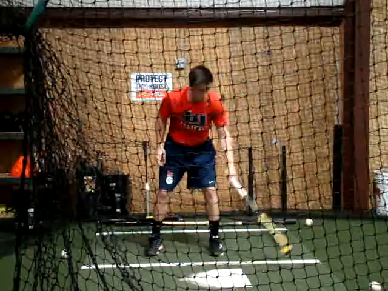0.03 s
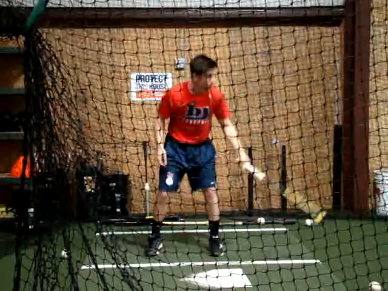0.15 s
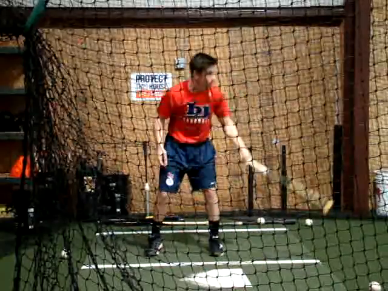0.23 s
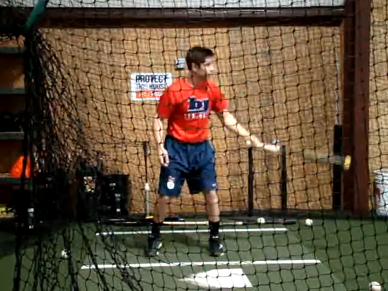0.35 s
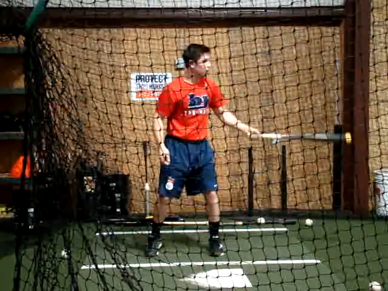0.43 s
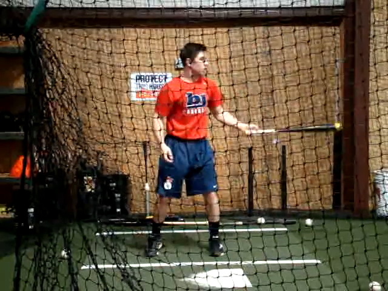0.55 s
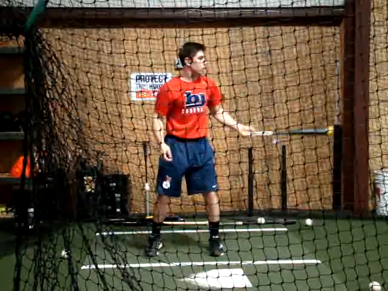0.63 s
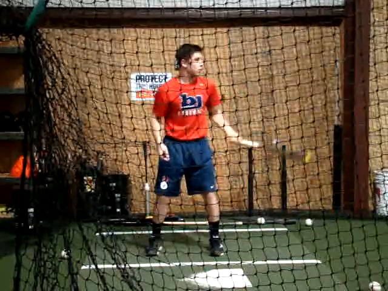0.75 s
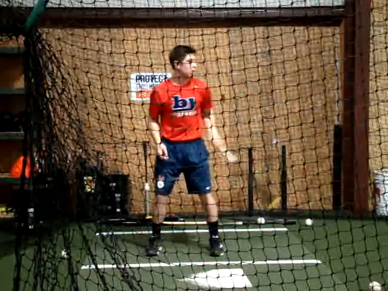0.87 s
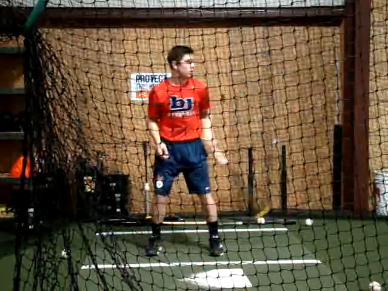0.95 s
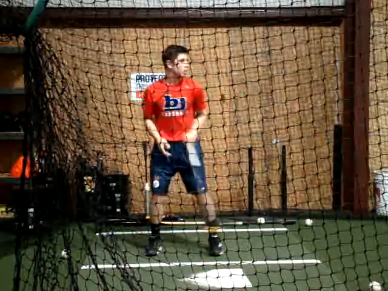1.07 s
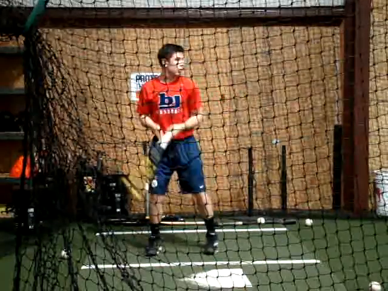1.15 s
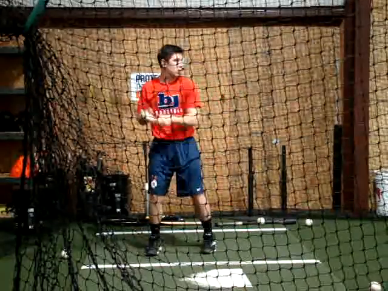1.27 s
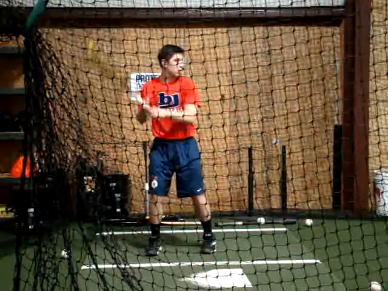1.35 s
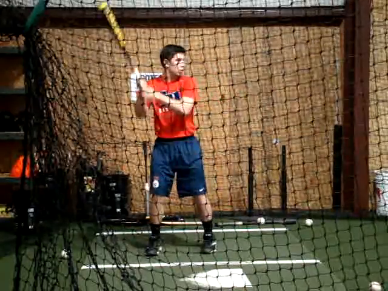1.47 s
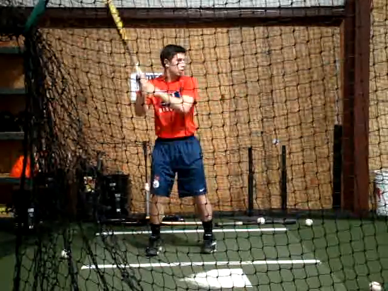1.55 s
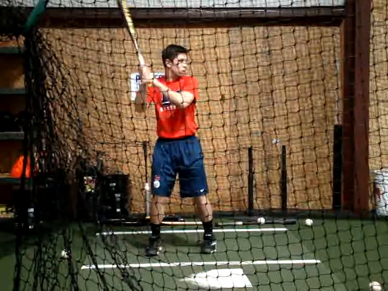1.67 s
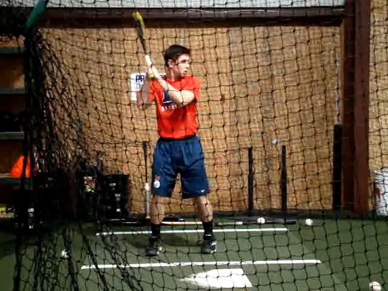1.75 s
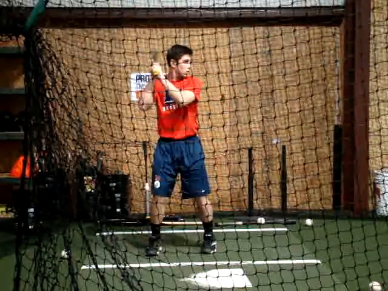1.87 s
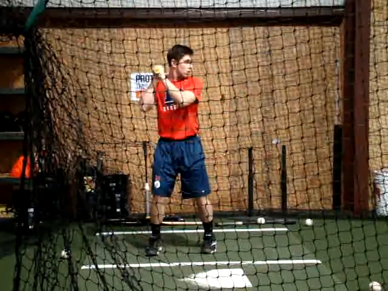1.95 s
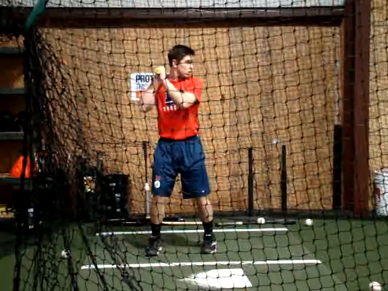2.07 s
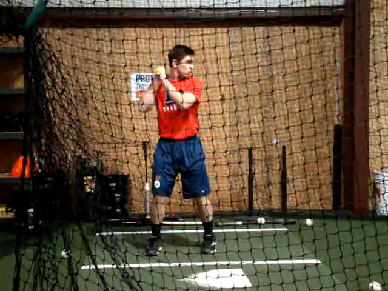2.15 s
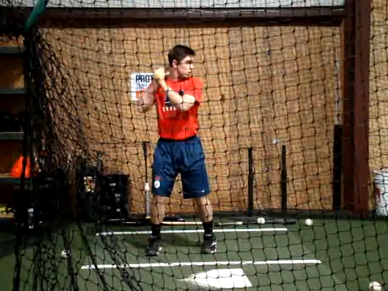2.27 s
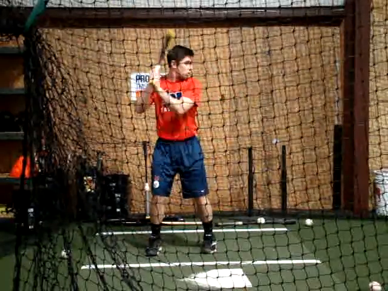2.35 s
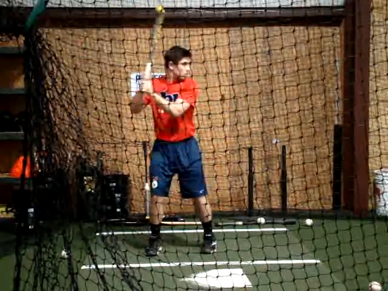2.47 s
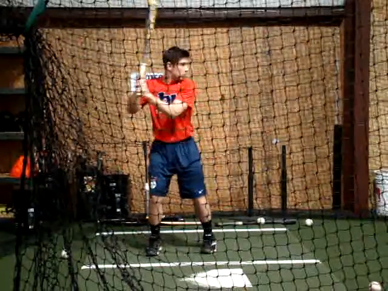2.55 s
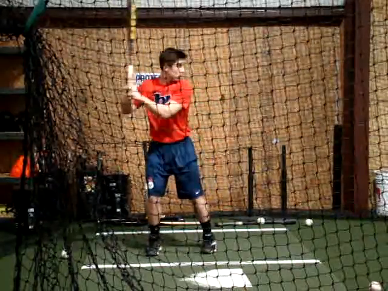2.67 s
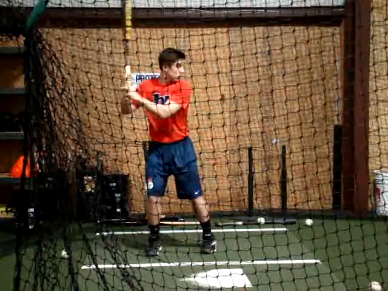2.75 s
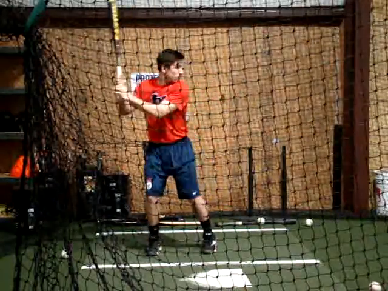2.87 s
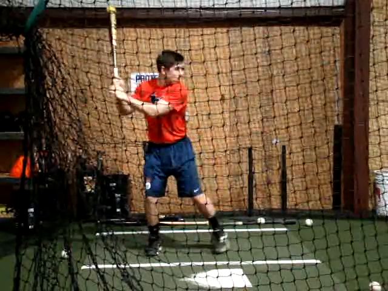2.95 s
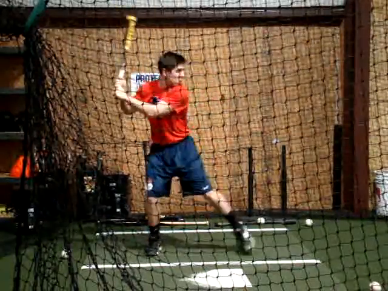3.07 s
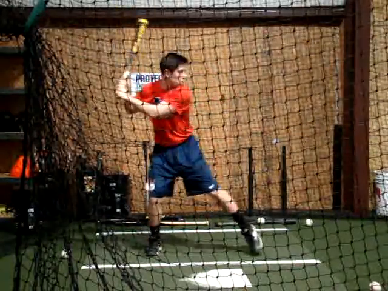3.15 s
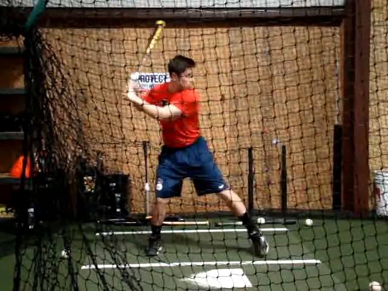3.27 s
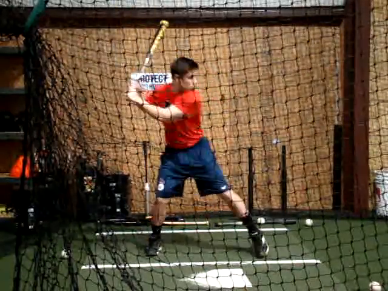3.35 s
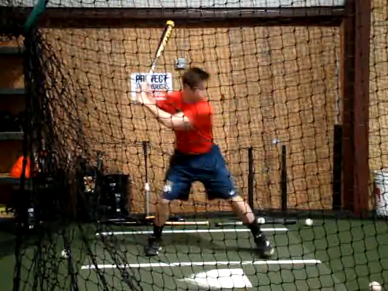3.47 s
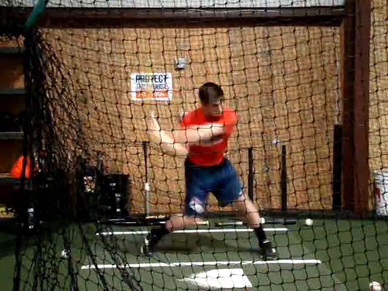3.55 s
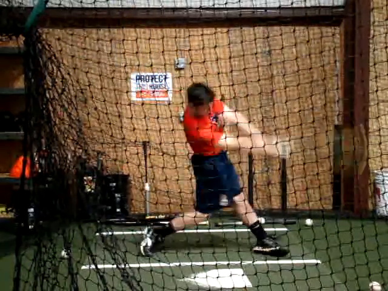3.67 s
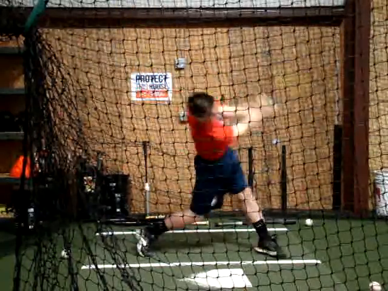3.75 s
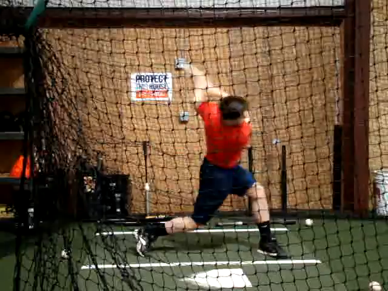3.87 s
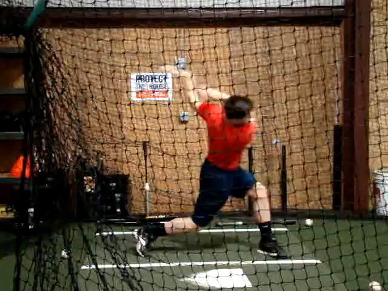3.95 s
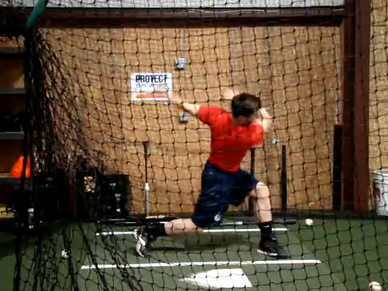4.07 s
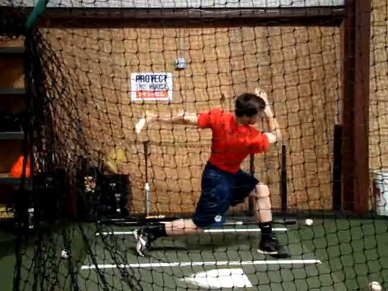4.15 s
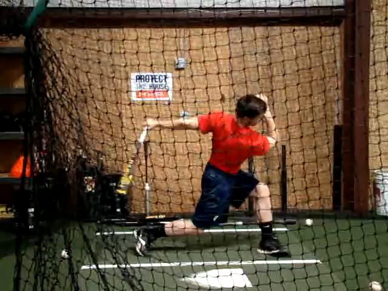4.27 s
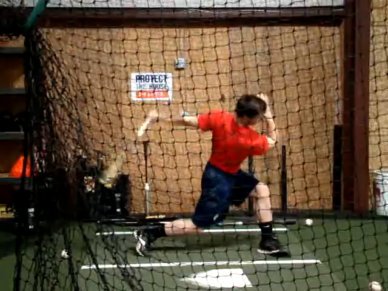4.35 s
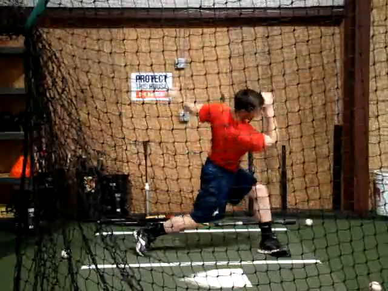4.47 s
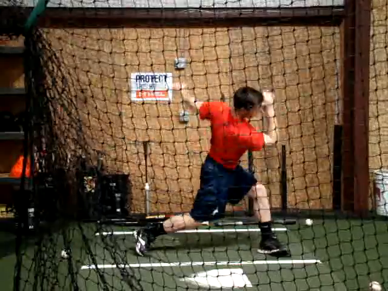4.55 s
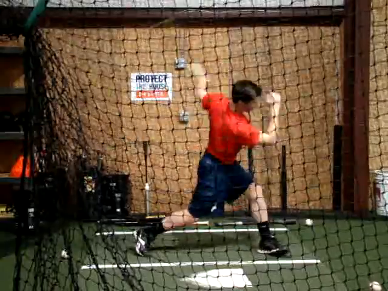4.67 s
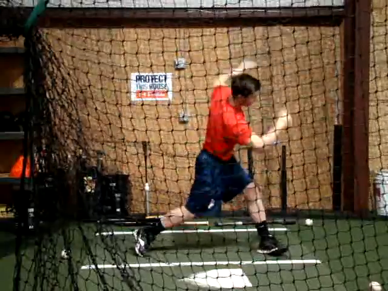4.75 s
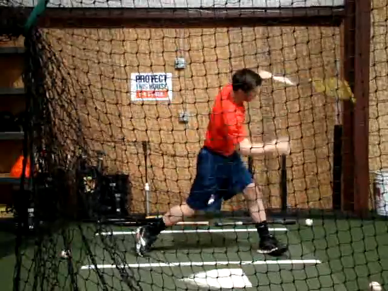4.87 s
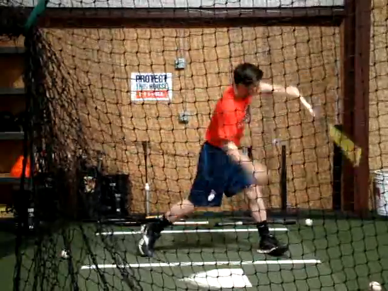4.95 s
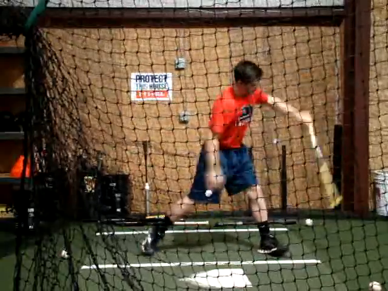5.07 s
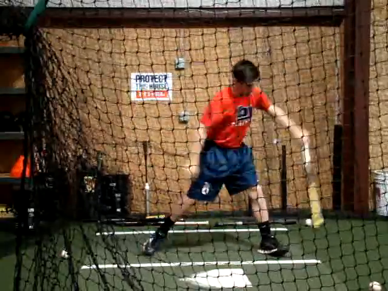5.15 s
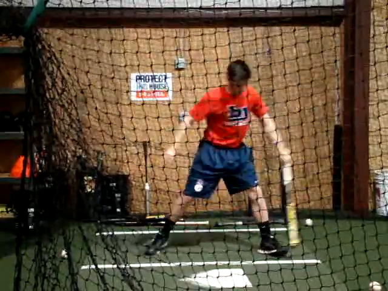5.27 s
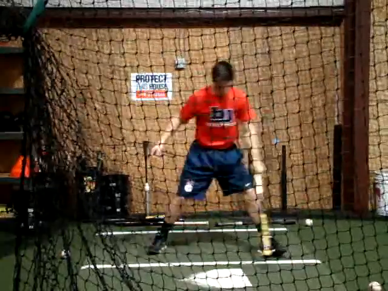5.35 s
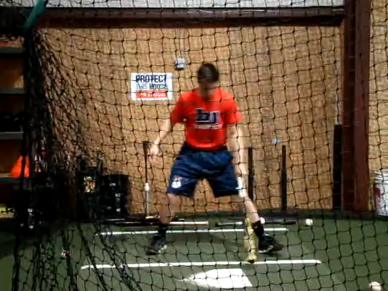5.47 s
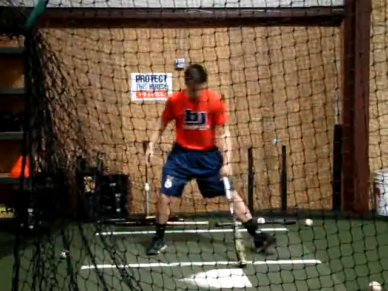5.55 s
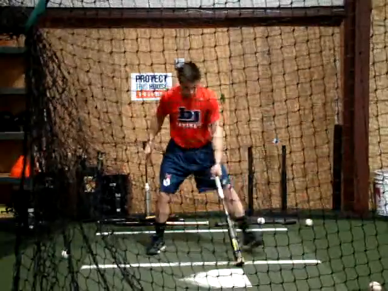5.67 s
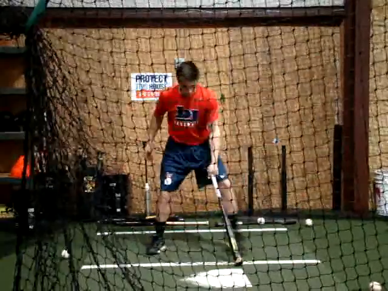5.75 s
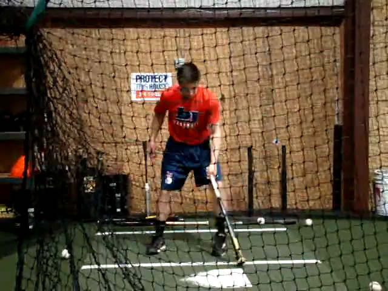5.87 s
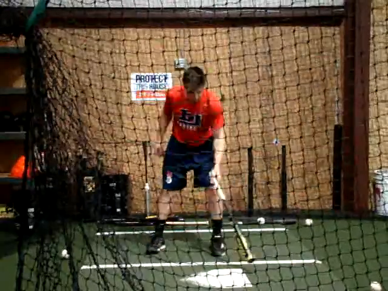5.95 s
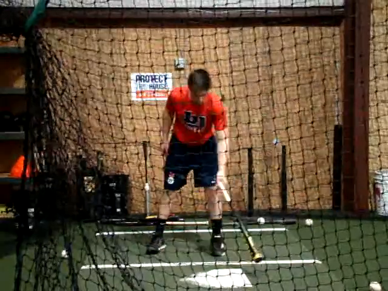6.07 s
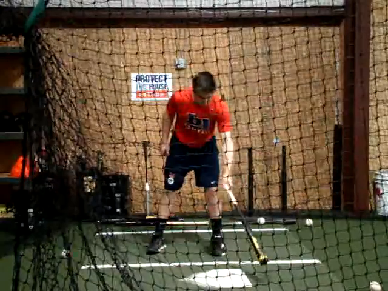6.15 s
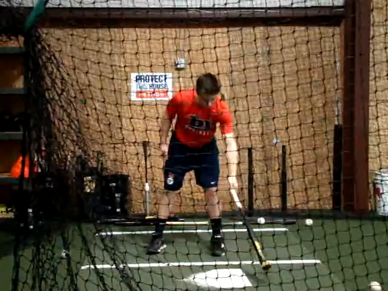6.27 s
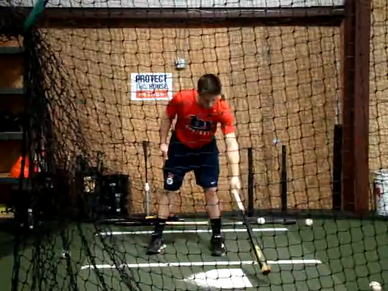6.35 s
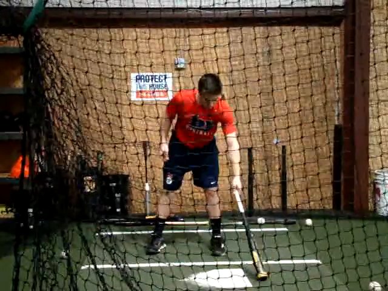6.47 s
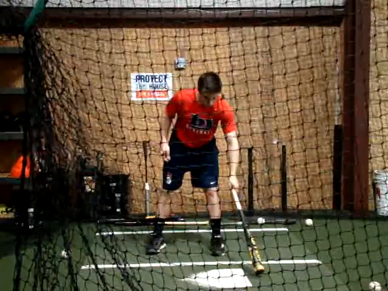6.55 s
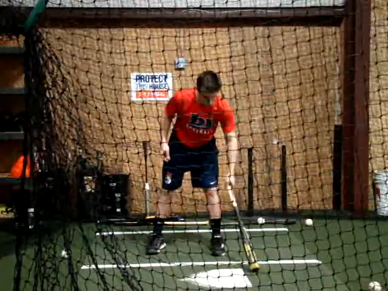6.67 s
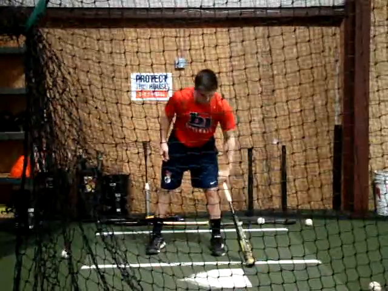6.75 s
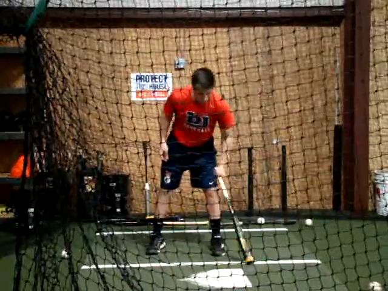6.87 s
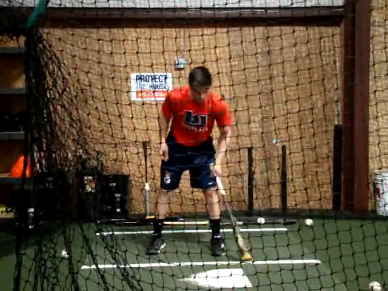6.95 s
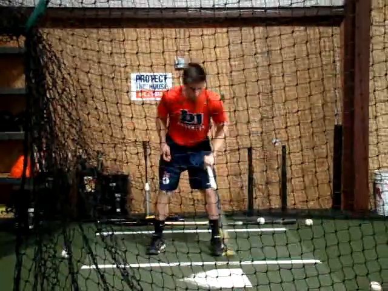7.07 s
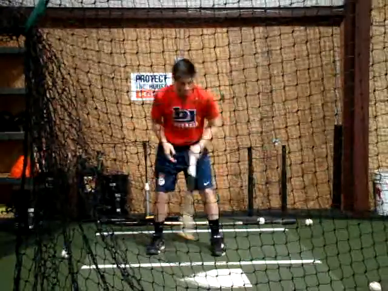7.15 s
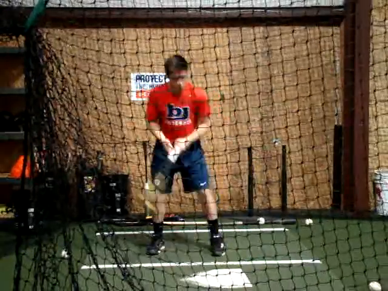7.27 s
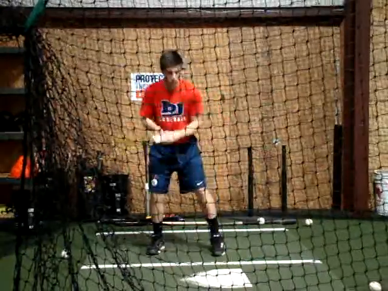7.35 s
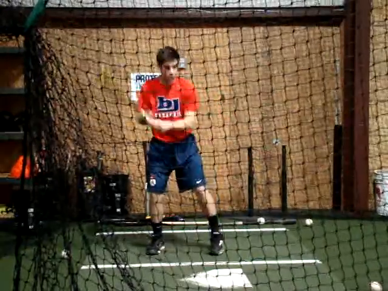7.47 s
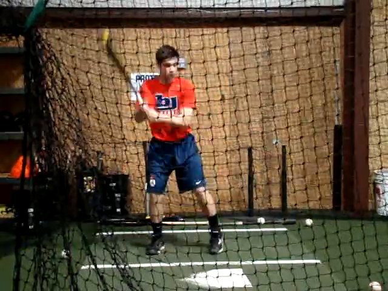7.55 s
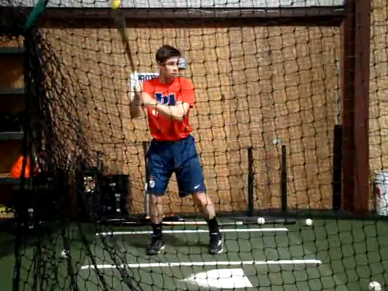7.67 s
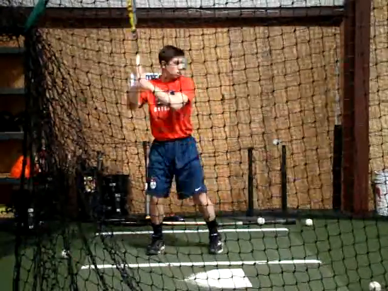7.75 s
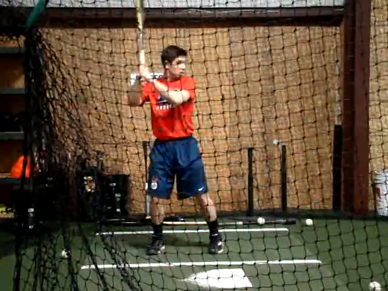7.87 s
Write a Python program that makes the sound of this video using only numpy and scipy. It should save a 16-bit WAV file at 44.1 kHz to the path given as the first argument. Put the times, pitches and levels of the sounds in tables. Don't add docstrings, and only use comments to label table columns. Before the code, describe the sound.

Inside a large, reverberant batting shed, lamps buzz faintly and a propeller aircraft drones outside over deep rumble. Soft shoe scuffs, cloth brushes and tiny grip ticks precede a rising swish, then one sharp, loud metal bat crack with a high ring and slapping wall echoes. The small camera microphone a few metres away ducks the background, which creeps back before more scuffs and a bat tap on turf.

```python
import sys
import numpy as np
from scipy import signal
from scipy.fft import rfft, irfft, next_fast_len
from scipy.io import wavfile
from scipy.ndimage import uniform_filter1d, map_coordinates

SR = 44100
rng = np.random.default_rng(int(sys.argv[2]) if len(sys.argv) > 2 else 0)


def gain_from_db(level_db):
    decades = np.asarray(level_db, float) / 20
    return 10 ** decades


def materialize(psi):
    bounded = np.clip(np.atleast_2d(psi).T, -1, 1)
    quanta = np.round(bounded * 32767).astype(np.int16)
    wavfile.write(sys.argv[1], SR, quanta)


N = 349272
TIME = np.arange(N) / SR
BLOW_S = 3.7332

# [t/s, level/dB]
AIRCRAFT_LEVEL = [(0, -59), (.7, -54.5), (1.1, -51.5), (2.1, -47), (2.6, -44), (3.65, -46.5), (5.1, -48.5),
                  (6.4, -42.5), (7.3, -43.5), (7.92, -56)]


def unit(x):
    return x / np.sqrt(np.mean(x ** 2) + 1e-20)


def along(points, hz):
    f, v = np.transpose(points)
    return np.interp(np.log(hz + 1), np.log(f + 1), v)


def curve(rows, outside=None):
    s, db = np.transpose(np.vstack(rows))
    return np.interp(TIME, s, db, outside, outside)


def wobble(rate, size=N):
    knots = rng.standard_normal(int(size * rate / SR) + 4)
    return map_coordinates(knots, [np.arange(size) * rate / SR])


def filtered(x, gain):
    m = next_fast_len(len(x) + 8192)
    return irfft(rfft(x, m) * gain(np.fft.rfftfreq(m, 1 / SR)), m)[:len(x)]


def noise(spectrum, size):
    return unit(filtered(rng.standard_normal(size), lambda hz: gain_from_db(along(spectrum, hz))))


def add_at(out, s, sound):
    out[round(s * SR):][:len(sound)] += sound


def duck(depth_db, attack_s, hold_s, release_s):
    since = np.clip(TIME - BLOW_S, 0, None)
    recovery = np.exp(-np.clip(since - hold_s, 0, None) / release_s)
    return -depth_db * (1 - np.exp(-since / attack_s)) * recovery


def creep(rest_db, db_per_s):
    return rest_db + db_per_s * np.where(TIME < BLOW_S, TIME, TIME - BLOW_S)


def preamp_hiss():
    # [f/Hz, level/dB]
    hiss_colour = [(20, -18), (100, -23), (1000, 2.5), (5000, 3.5), (10100, -4.5), (13000, -26)]
    return gain_from_db(-58.0) * noise(hiss_colour, N)


def rumble():
    near_db = curve(AIRCRAFT_LEVEL)
    level_db = -73 + 0.3 * (near_db - near_db.mean())
    level_db += duck(14, .05, 1.22, 1.24) + 1.5 * wobble(8.5)
    return gain_from_db(level_db) * noise([(15, -26.0), (30, -5), (65, 5), (90, 11), (130, -36.5), (300, -84)], N)


def plane():
    multiples = [1, 2, 1.61, 2.63]
    tone_db = [0.5, 1, -5.5, -10]
    # [t/s, depth/dB (negative for a swell), half-width/s]
    cancellations = [
        [(.15, 6.5, 0.24), (1.42, 11.5, 0.19), (2.63, 16.5, 0.085), (3.0, 4.5, .3), (4.9, 15, 0.51),
         (5.6, 5.5, 0.41), (6.25, 21, 0.4), (7.5, 6.5, 0.99)],
        [(.7, 11.5, 0.29), (1.33, 28, .06), (1.82, 26, 0.047), (2.33, 10.5, 0.061), (2.79, 14, 0.074),
         (3.13, 8.5, .05), (3.3, 11.5, 0.067), (3.49, 12, 0.059), (5.25, 13.5, 0.033), (5.5, 8.5, 0.35),
         (5.86, 3, 0.046), (6.17, 8, 0.043), (6.55, 2, .05), (7.09, 13, 0.093), (7.85, 11, 0.2)],
        [(.4, 20, 0.36), (1.6, 16, 0.95), (2.75, 5, .2), (5.5, 9, 0.25), (6.9, 21, 0.98)],
        [(.8, 22.5, 0.25), (2.7, 14.5, 0.15), (3.35, 17.5, 0.1), (5.5, 13.5, 0.53), (6.3, 5, 0.26),
         (7.0, 12, 0.05), (7.9, -13, 0.29)],
    ]
    # [depth/dB, attack/s, hold/s, release/s]
    tone_ducks = [(36, .03, 0.38, 0.41), (25, .02, 1.04, 0.17), (30, .03, 0.65, 0.66),
                  (24, .04, 0.42, 0.86)]
    # [multiple of blade rate, level/dB]
    late_whine = [(5.58, -67.5), (6.22, -64), (3.6, -78), (2.44, -73)]
    blade_hz, doppler_hz, overhead_s, pass_s = 116, 8.5, 4.1, 4
    rate_hz = blade_hz - doppler_hz * np.tanh((TIME - overhead_s) / pass_s) + 0.38 * wobble(3)
    phase = 2 * np.pi * np.cumsum(rate_hz) / SR
    near_db = curve(AIRCRAFT_LEVEL)
    drone = np.zeros(N)
    for multiple, db, fades, ducked in zip(multiples, tone_db, cancellations, tone_ducks):
        level_db = near_db + db + duck(*ducked) + 2.5 + 1.04 * wobble(9.6)
        for s, depth_db, half_s in fades:
            level_db -= depth_db / (1 + ((TIME - s) / half_s) ** 2)
        drone += gain_from_db(level_db) * np.sin(multiple * phase)
    passed = np.clip((TIME - 6.2) / .5, 0, 1)
    for multiple, db in late_whine:
        drone += passed * gain_from_db(db + 4.5 + 3.2 * wobble(5.5)) * np.sin(multiple * phase)
    return drone


def air():
    # [f/Hz, level/dB]
    air_colour = [(50, -37.5), (85, -28.5), (124, -11.5), (175, -16), (236, -10), (381, -16), (1240, -16),
                  (2210, -20), (2540, -26), (4110, -25.5), (4820, -34), (9510, -31.5), (10100, -49),
                  (13100, -62), (22000, -120)]
    # [t/s, level/dB]
    slow_swell = [(0, -1), (1, 0.5), (2, -3), (3, -3.5), (5, -0.5), (6, 1), (7, -2.5), (7.92, -1)]
    z = signal.stft(noise(air_colour, N), nperseg=512)[2]
    field = uniform_filter1d(uniform_filter1d(rng.standard_normal(z.shape), 7, 0), 16, 1)
    patchy = signal.istft(z * gain_from_db(1.5 * unit(field)), nperseg=512)[1][:N]
    level_db = -52.5 + curve(slow_swell) + 0.68 * wobble(2.454) + 0.2 * wobble(11.0)
    return gain_from_db(level_db) * unit(patchy)


def lamps():
    # [f/Hz, level/dB]
    buzz_tones = [(721.4, -76.5), (1319, -72.5), (1443, -68), (1561, -70), (1680, -68), (1798, -65.5),
                  (2040, -70.5), (2159, -69.5), (2283, -66), (2401, -71), (2762, -72.5), (3122, -80),
                  (3241, -77.5), (3359, -75.5), (3601, -87), (3720, -74), (3962, -70), (4081, -70.5),
                  (4199, -77), (4441, -78.5), (4560, -99), (5039, -81), (5163, -77)]
    buzz_hz = 120.03
    out = np.zeros(N)
    for hz, db in buzz_tones:
        exact_hz = round(hz / buzz_hz) * buzz_hz
        tone = np.sin(2 * np.pi * (exact_hz * TIME + rng.random()))
        out += gain_from_db(db + 2.5 + 2.0 * wobble(3.13)) * tone
    return out


def scuffs():
    # [t/s, level/dB, fade/s, centre f/Hz]
    scrapes = [(.141, -52.5, 0.084, 500), (.139, -48.5, 0.024, 2190), (5.658, -51, 0.081, 3500),
               (5.89, -50, 0.18, 1670), (6.504, -53.5, .07, 4500), (6.53, -54, 0.071, 885),
               (6.722, -51, .075, 5040), (6.739, -57.5, .14, 1500), (6.838, -51, 0.12, 4470),
               (6.87, -55, .2, 1500), (6.7, -56.5, 0.56, 654)]
    # [t/s, level/dB, fade/s, centre f/Hz]
    brushes = [(.22, -62, .1, 4000), (1.05, -57, 0.12, 2000), (1.198, -53.5, 0.071, 1500),
               (1.315, -50, .14, 1290), (1.31, -59, .1, 4500), (3.0, -53.5, .06, 1500),
               (5.0, -54.5, 0.063, 3000), (5.401, -56, 0.34, 2230), (5.718, -48, .08, 1500),
               (5.71, -54, 0.072, 5000), (7.682, -55.5, .11, 1500), (7.85, -59, 0.15, 1000)]
    out, t = np.zeros(N + SR), np.arange(SR // 2) / SR
    rubs = [(.008, *row) for row in scrapes]
    rubs += [(.45 * row[2], *row) for row in brushes]
    for rise_s, s, db, fade_s, hz in rubs:
        falling = gain_from_db(-20 * np.clip(t - rise_s - 0.34 * fade_s, 0, 1) / fade_s)
        shape = np.where(t < rise_s, (t / rise_s) ** 2, falling)
        puff = noise([(hz / 5, -22), (hz / 2, -5), (hz, 0), (hz * 2.27, -9), (hz * 8, -25)], len(t))
        grain_db = 1.5 * wobble(146, size=len(t)) + 0.74 * wobble(36.7, size=len(t))
        add_at(out, s - rise_s, gain_from_db(db + grain_db) * shape * puff)
    return out[:N]


def ticks_and_taps():
    # [t/s, peak level/dB, f/Hz]
    ticks = [(1.129, -48, 2300), (1.635, -47, 3500), (1.705, -44, 3100), (1.821, -47, 2000),
             (1.868, -43, 4200), (3.468, -47, 3500), (5.886, -45, 2500), (6.277, -46, 4200),
             (6.507, -43, 4500), (6.84, -42, 4500), (7.204, -48, 4000), (7.652, -47, 2500)]
    # [t/s, peak level/dB, f/Hz]
    taps = [
        (.135, -49, 555),
        (.136, -52, 340),
        (5.705, -44.5, 960),
        (5.72, -49, 2020),
        (6.86, -47, 347),
    ]
    out, t = np.zeros(N + SR), np.arange(SR // 2) / SR
    for s, db, hz in ticks:
        ping = noise([(hz / 3.7, -18), (hz, 0), (hz * 1.9, -18)], len(t))
        add_at(out, s, gain_from_db(db - 3.0 - 60 * t / 0.048) * ping)
    spread = 1.14
    for s, db, hz in taps:
        knock = noise([(hz / spread, -20), (hz, 0), (hz * spread, -20), (hz * 4, -60)], len(t))
        add_at(out, s, gain_from_db(db - 60 * t / 0.1) * knock)
    return out[:N]


def swing():
    # [t/s, level/dB]
    swing_level = [(3.54, -55), (3.576, -38.5), (3.694, -40.5), (3.726, -34), (3.728, -35.5)]
    # [f/Hz, level/dB]
    swish_colour = [(120, -36), (200, -24), (232, -14), (264, -16), (652, -10), (920, -12), (1660, -6),
                    (10100, -21), (13100, -49), (22000, -120)]
    level_db = curve([*swing_level, (3.7305, -30), (BLOW_S, -24)], -120)
    return gain_from_db(level_db + 0.65 * wobble(120)) * noise(swish_colour, N)


def shed(x):
    # [f/Hz, t60/s]
    decay_times = [(200, 0.83), (600, 0.43), (1500, 1.09), (3200, 1.13), (6000, 0.96), (10000, 0.69)]
    hz, t, z = signal.stft(rng.standard_normal(2 * SR), SR, nperseg=256)
    tail = signal.istft(z * gain_from_db(-60 * t / along(decay_times, hz)[:, None]), SR, nperseg=256)[1]
    tail *= np.clip(np.arange(len(tail)) / SR / 0.013, 0, 1)
    return signal.fftconvolve(x, tail / np.linalg.norm(tail))


def barrel_ring(t):
    # [f at contact/Hz, f after the swing/Hz, level/dB, t60/s]
    barrel_tones = [(2960, 3450, -7, 0.3), (1500, 2200, -26.5, 0.036)]
    bend = 1 - np.exp(-t / .035)
    ring = np.zeros(len(t))
    for low_hz, high_hz, db, t60_s in barrel_tones:
        phase = 2 * np.pi * np.cumsum(low_hz + (high_hz - low_hz) * bend) / SR
        ring += gain_from_db(db - 60 * t / t60_s) * np.sin(phase)
    return ring


def pressure_dip(t):
    width_s, rebound_s = .00028, .0009
    squeeze = -(t / width_s) ** 0.22
    rebound = 0.64 * width_s / rebound_s * np.exp(-(t - width_s) / rebound_s)
    return uniform_filter1d(gain_from_db(0.5) * np.where(t < width_s, squeeze, rebound), size=3)


def bat():
    # [f/Hz, level/dB]
    crack_colour = [(150, -35.5), (400, -16.5), (1000, -6.5), (1350, -6.5), (1590, 2), (1850, -5),
                    (2400, -6), (2800, 1.5), (3600, -2), (4200, -8.5), (7000, -15.5), (10100, -21),
                    (13000, -47)]
    # [delay/s, level/dB]
    first_echoes = [
        (.0046, -2),
        (.0143, 3),
        (.0271, -5),
        (.0362, -4),
    ]
    t = np.arange(SR // 2) / SR
    ring = barrel_ring(t)
    dip = pressure_dip(t)
    ping = gain_from_db(-0.5) * ring * (1 - np.exp(-t / 0.003))
    snap = gain_from_db(7.0) * np.gradient(dip) + gain_from_db(1.5) * ping
    wash = filtered(shed(np.ones(1)), lambda hz: gain_from_db(34.0 + along(crack_colour, hz)))
    wash *= gain_from_db(0.77 * wobble(110, size=len(wash)))
    out = gain_from_db(7) * shed(ring)[:len(wash)] + wash
    out[:len(t)] += dip + ping
    for s, db in first_echoes:
        out[:len(t)] += gain_from_db(db) * np.pad(snap, (round(s * SR), 0))[:len(t)]
    return np.pad(out, (round(BLOW_S * SR), N))[:N]


def gain_control(indoors):
    treble_db = creep(0.8, 0.23) + duck(7.2, 0.0034, 0.069, 0.12) + duck(6.46, 0.4, 1.05, 0.55)
    bass_db = creep(-2.5, 1.94) + duck(8.9, 0.009, 0.0097, .08) + duck(20, .07, 0.87, 0.57)
    bass = signal.sosfilt(signal.butter(1, 500, fs=SR, output="sos"), indoors)
    low_cut = indoors - (1 - gain_from_db(bass_db - treble_db)) * bass
    return gain_from_db(treble_db) * low_cut


def scene():
    indoors = air() + lamps() + scuffs() + ticks_and_taps() + swing() + bat()
    return (preamp_hiss() + rumble() + plane() + gain_control(indoors))[None]


def starved(x):
    share, low_hz = 0.034, 4500
    hz, _, z = signal.stft(x, SR, nperseg=256)
    empty = rng.random((z.shape[0] // 4 + 1, z.shape[1] // 3 + 1)) < share
    empty = np.kron(empty, np.ones((4, 3)))[:z.shape[0], :z.shape[1]]
    empty = empty * (hz > low_hz)[:, None]
    return signal.istft(z * (1 - .95 * empty), SR, nperseg=256)[1][:N]


def roll_off(x):
    return signal.sosfilt(signal.butter(12, 11320, fs=SR, output="sos"), x)


def record(dry):
    top, knee = .72, 4
    soft = dry[0] / (1 + np.abs(dry[0] / top) ** knee) ** (1 / knee)
    mix = filtered(starved(soft), lambda hz: gain_from_db(-np.clip((hz - 10080) / 9, 0, 62)))
    return roll_off(mix[None])


dry = scene()
out = record(dry)
materialize(out)
```